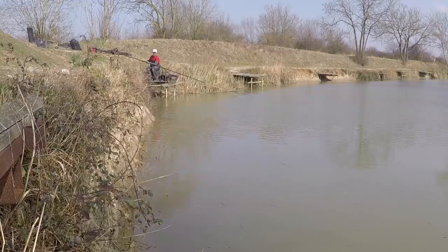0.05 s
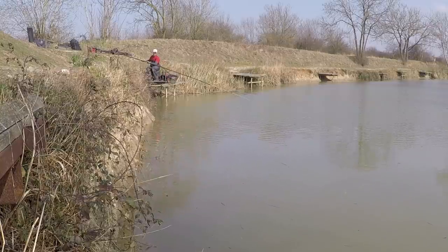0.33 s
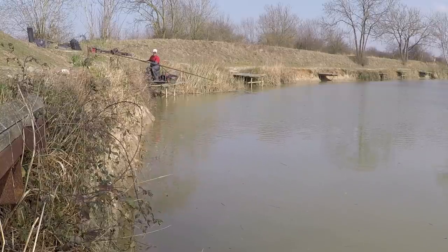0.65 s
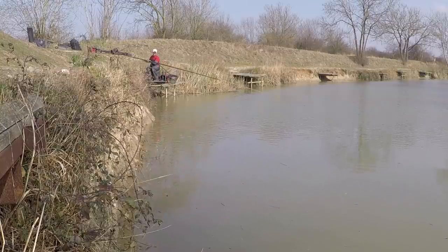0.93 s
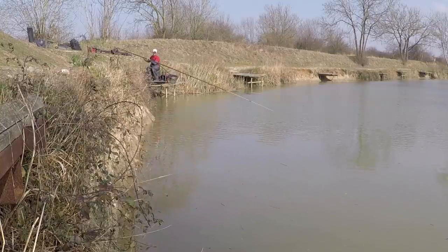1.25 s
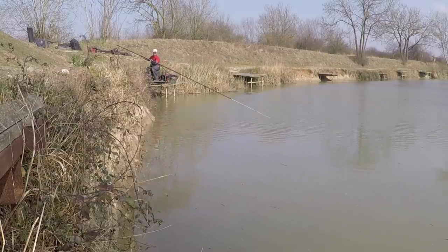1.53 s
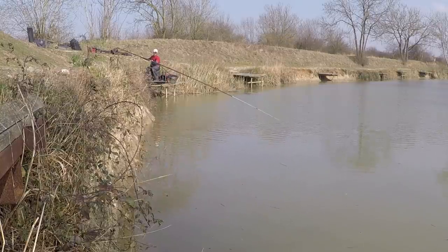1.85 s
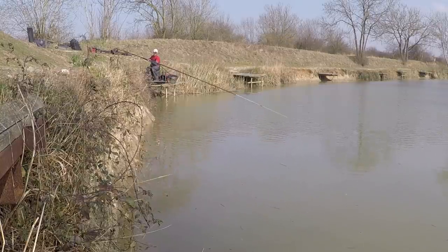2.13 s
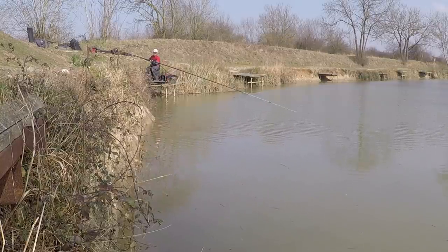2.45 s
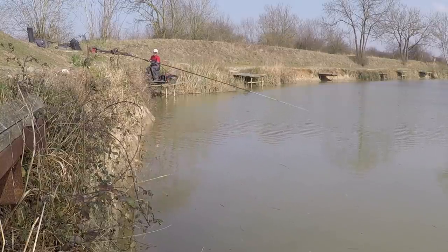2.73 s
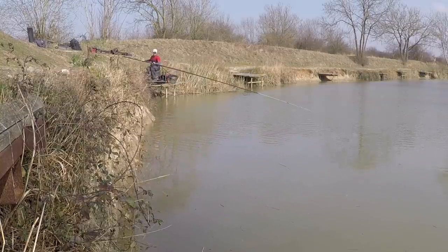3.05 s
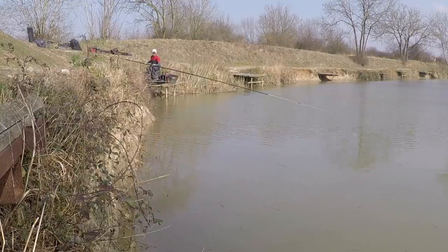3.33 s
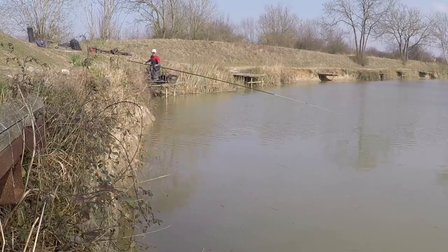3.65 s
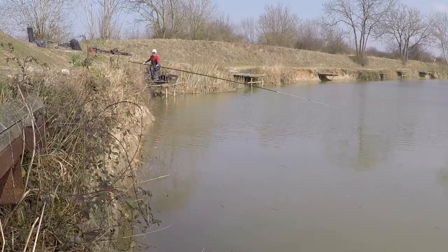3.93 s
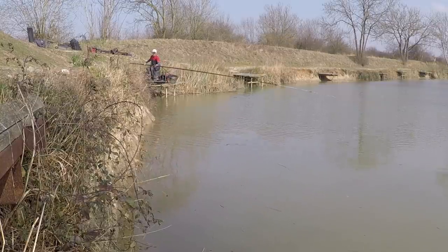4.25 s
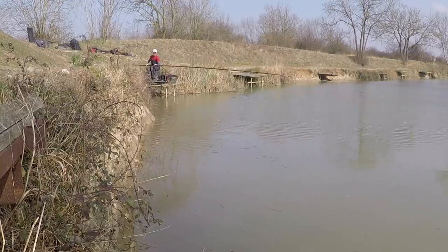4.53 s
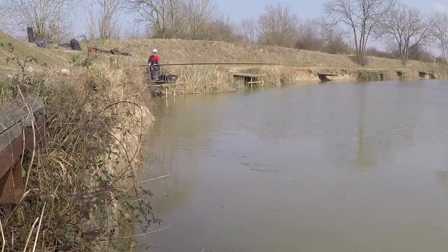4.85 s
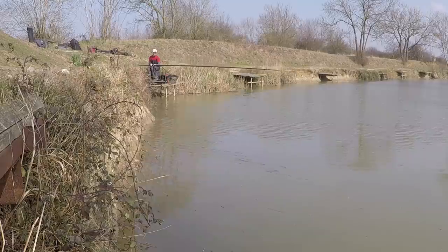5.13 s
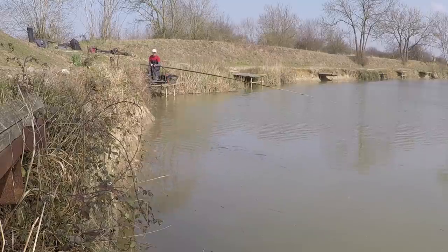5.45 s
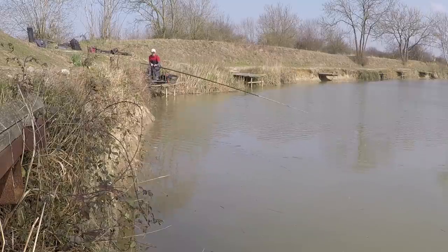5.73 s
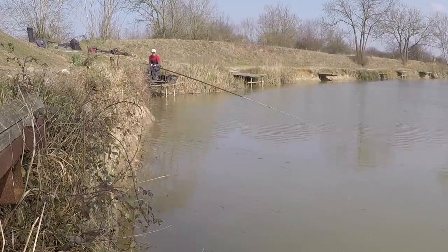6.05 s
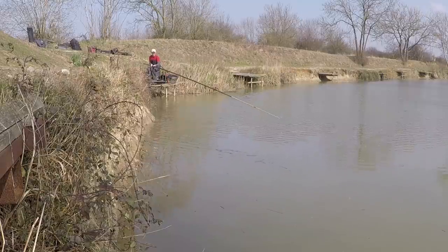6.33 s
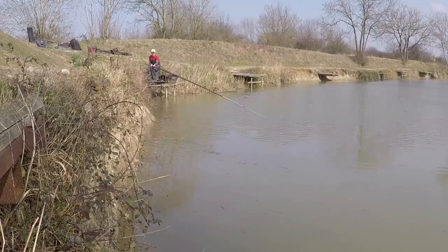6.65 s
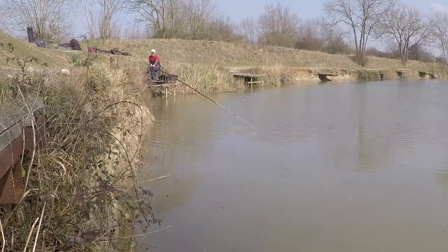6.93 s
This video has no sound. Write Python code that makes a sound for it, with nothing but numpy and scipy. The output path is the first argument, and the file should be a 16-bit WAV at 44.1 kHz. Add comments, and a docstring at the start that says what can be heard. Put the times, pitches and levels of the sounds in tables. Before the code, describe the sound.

A long hollow fishing pole slides through an angler's hands from the start, making dry, hissing strokes, about two or three a second, with small scuffs and faint sleeve rustle. The tube gives one light, hollow knock at about 1.4 seconds, and soft ticks come near 1 and 2 seconds. The strokes are strongest around 4 seconds. From about 4.8 to 5.6 seconds, during one longer slide, the rubbed tube sings a thin two-note whistle that swoops upward. From 5.5 seconds sleeves rustle and hands and tackle tick, with the sharpest clicks between 5.6 and 6 seconds, while the hiss fades toward the end at about 7 seconds. The handling sounds close and centred. Behind it, faint wind washes steadily over the open lake bank, and a far engine drones low, swelling slightly around 2 to 3 seconds.

```python
"""A long hollow fishing pole hisses in strokes, by sliding friction, as an angler draws it through his hands.
Struck once, the tube rings in its normal modes; as it is swung up, rubbing makes two resonances sing.
His sleeves rustle, and hands and tackle tick, most of all as he lowers the pole.
Behind him on the lake bank lie the broadband wash of wind over open ground and a far engine's drone."""
import sys
import numpy as np
from scipy import signal
from scipy.io import wavfile
from scipy.ndimage import uniform_filter1d

SR = 44100
rng = np.random.default_rng(int(sys.argv[2]) if len(sys.argv) > 2 else 0)


def generate_wav(signal):
    """Clip the signal to [-1, 1] and save it as 16-bit WAV at the path in sys.argv[1]."""
    frames = np.transpose(np.atleast_2d(signal))
    scaled = np.clip(frames, -1, 1) * 32767
    pcm = np.round(scaled).astype(np.int16)
    wavfile.write(sys.argv[1], SR, pcm)


N = 312669
TIME = np.arange(N) / SR

# Reach of the sharp part of the friction hiss: f/Hz, weight
SHARP_WEIGHT = [(4800, 0.2), (6200, 0.39), (7400, 1.17), (10000, 0.92)]


def pole_hiss(level_db=-0.5, rest_db=-70, patchy_db=1.5, flutter_db=0.6, grain_db=-0.1):
    """Sliding friction: the pulls add in power over a faint floor, and flutter as the skin catches."""
    # Pulls through the hand: t/s, duration/s, relative peak level/dB, fade/dB, hollow part/dB,
    # sharp part/dB, ridge f at mid-pull/Hz, ridge glide/Hz, ridge height/dB
    pulls = [(-0.105, 0.36, -40, 11, -10.5, -3.5, 5170, 0, 0.5),
             (0.181, 0.22, -44, 6.5, -7, -1.5, 5650, 600, 6),
             (0.372, 0.36, -41.3, 15, -8.5, -1.5, 4750, -700, 3.5),
             (0.652, 0.364, -43.5, 5, -5.5, -3, 5300, -2, 1.5),
             (0.989, 0.23, -39, 18.5, -8.5, 1, 4730, 0, 2), (1.163, 0.37, -39, 13.5, -7, -3, 5900, -2, 2),
             (1.52, 0.36, -37, 15, -10, 0, 4330, 0, 1.5), (1.832, 0.14, -42.5, 12, -5.5, -2, 4550, 0, 2),
             (1.932, 0.52, -40.5, 35.5, -5, -2.5, 4500, -2, 0),
             (2.56, 0.37, -39, 3.5, -5, -1, 4170, -2, 1.5), (2.842, 0.36, -41.5, 7.5, -5, -3.5, 5900, 0, 0),
             (3.152, 0.26, -38.5, 6, -8, -0.5, 4500, 600, 0.5),
             (3.379, 0.35, -37.5, 15, -6.5, -3.5, 4160, -1, 1.5),
             (3.72, 0.36, -34, 7, -10, -4, 4400, 1002, 1),
             (4.06, 0.46, -32, 14.5, -10, -2.5, 3780, 602, -1),
             (4.447, 0.17, -43.5, 18, -2.5, -2.5, 4200, 0, 0.5),
             (4.569, 0.14, -49.5, 17, 1.5, -1.5, 4200, 0, 3.5), (4.702, 0.22, -50, 2, 6, -4, 4200, -5, -2),
             (4.749, 0.97, -35.5, 8.5, -3.5, -3.5, 4400, -100, 2.5),
             (5.643, 0.26, -38.5, 21, -0.5, -3, 3930, 3, 4),
             (5.806, 0.31, -43, 15, -3.5, -6, 4240, -2, 0.5),
             (6.09, 0.27, -47.5, 27.5, 2.5, -7.5, 5900, 0, 0.5), (6.31, 0.23, -52.5, 32, 5, -7, 3600, 8, 3),
             (6.484, 0.38, -48, 20, 5, -5.5, 3300, -3, 1.5), (6.79, 0.47, -56, 0, 0, -3, 4050, 3, 6)]
    t, hz = grid(size=512)
    power = np.tile(gain_of(rest_db + grip_spectrum(hz, hollow_db=6, sharp_db=-2)) ** 2, (len(t), 1))
    for start, length, *manner in pulls:
        during = (t > start) & (t < start + length)
        power[during] += pull_power(t[during, None], hz, start, length, *manner)
    field_db = 10 * np.log10(power)
    field_db += patchy_db * patches(field_db.shape, frames=24, bins=7)
    field_db += flutter_db * patches((len(t), 1), frames=8, bins=1)
    grain = patches((N, 1), frames=24, bins=1)[:, 0]
    return shaped_noise(field_db + level_db) * gain_of(grain_db * grain)


def pull_power(t, hz, start, length, db, fade_db, hollow_db, sharp_db, ridge_hz, glide_hz, ridge_db):
    """Friction noise of one pull: brightest when loudest, with a ridge that glides as the hand travels."""
    ridge_width_hz, brightening = 660, 0.29
    level_db = 20 * np.log10(stroke(t, start, length, db, fade_db) + 1e-9)
    centre_hz = ridge_hz + glide_hz * ((t - start) / length - .5)
    ridge = ridge_db * np.exp(-((hz - centre_hz) / ridge_width_hz) ** 2)
    treble_db = brightening * (level_db - db) * read_spectrum(SHARP_WEIGHT, hz)
    return gain_of(level_db + grip_spectrum(hz, hollow_db, sharp_db) + ridge + treble_db) ** 2


def grip_spectrum(hz, hollow_db, sharp_db, notch_db=2.0, notch_hz=6200, notch_width_hz=600):
    """Spectral shaping, in dB: the grip weights the hollow and sharp bands against the core of the hiss."""
    # Friction spectrum: f/Hz, relative spectral level/dB
    friction = [(300, -20), (800, -21.5), (1300, -9), (2000, -4.5), (3100, -2), (4200, 0.5), (5000, 0),
                (6100, -2), (7500, -1), (9600, -3.5)]
    # Reach of the hollow part: f/Hz, weight
    hollow_weight = [(500, 0.54), (1500, 1), (2600, 0.67), (3800, 0.0097)]
    base_db = read_spectrum(friction, hz)
    bands_hz = [(3300, 6500), (1500, 3000), (7000, 9800)]  # core, hollow, sharp
    power = gain_of(base_db) ** 2
    core, low, high = (10 * np.log10(np.mean(power * (hz > a) * (hz < b))) for a, b in bands_hz)
    hollow_boost = hollow_db - (low - core)
    sharp_boost = sharp_db - (high - core)
    hollow = hollow_boost * read_spectrum(hollow_weight, hz)
    sharp = sharp_boost * read_spectrum(SHARP_WEIGHT, hz)
    # a tight grip splits the hiss into two humps
    notch = notch_db * np.clip(sharp_boost, 0, 2) * np.exp(-((hz - notch_hz) / notch_width_hz) ** 2)
    return base_db - core + hollow + sharp - notch


def stroke(t, start, length, db, fade_db, speed_up_s=0.28, stop_s=0.04):
    """Amplitude envelope of an arm movement: it gathers speed as the pressure eases, then stops quickly."""
    progress = np.clip((t - start) / length, 0, 1)
    speed = np.tanh(progress * length / speed_up_s) * np.tanh((1 - progress) * length / stop_s)
    shape = speed * gain_of(-fade_db * progress)
    return gain_of(db) * shape / (shape.max() + 1e-12)


def pole_knock(chatter_db=-12, chatter_hz=2300, chatter_width_hz=2200, rise_s=0.0038, decay_scale=0.91):
    """Impact excitation: pole sections clack and chatter briefly, then the tube's damped modes ring out."""
    # Modes of the tube: f/Hz, relative level/dB, unscaled 60 dB decay time/s
    modes = [(450, -12, 0.082), (760, -15.5, 0.21), (843, -13, 0.26), (874, -5.5, 0.18), (1190, -2, 0.14),
             (1248, 2, 0.092), (1364, 0, 0.075), (1710, -12, 0.06), (1787, -5, 0.13), (2044, -0.5, 0.089),
             (2160, -6, 0.12), (2280, 1.5, 0.061), (2680, -10, 0.1), (2830, -8, 0.09), (3540, -7, 0.086),
             (3850, -3, 0.081), (4000, -12, 0.054)]
    # Blows on the pole: t/s, relative level/dB, chatter duration/s
    blows = [(1.3908, -20, 0.031)]
    out, t = np.zeros(N), np.arange(SR // 4) / SR
    for start, db, length in blows:
        ring = np.zeros(len(t))
        for hz, mode_db, t60 in modes:
            decay = gain_of(mode_db - 60 * t / (t60 * decay_scale))
            ring += decay * np.sin(2 * np.pi * (hz * t + rng.random()))
        ring /= np.linalg.norm(gain_of(np.array(modes)[:, 1])) / 2
        ring *= 1 - np.exp(-t / rise_s)
        chatter = resonant_noise(chatter_hz, chatter_width_hz, len(t)) * np.exp(-(t / length) ** 2)
        add(out, start, gain_of(db) * (ring + gain_of(chatter_db) * chatter))
    return out


def pole_song(width_hz=150, fade_s=0.02, steady=0.55):
    """Resonance of the rubbed tube: an upper note swoops up and holds, a lower joins late and wanders."""
    # Two-note whistle: t/s, upper f/Hz, upper level/dB, lower f/Hz, lower level/dB
    whistle = [(4.825, 1330, -52, 900, -75), (4.865, 1770, -37.5, 1000, -67), (4.885, 1830, -38, 1040, -64),
               (4.905, 2070, -41.5, 1100, -60), (4.95, 2300, -40.5, 1190, -55),
               (4.99, 2400, -40, 1230, -45), (5.07, 2495, -42.5, 1310, -47), (5.12, 2540, -40, 1390, -43.5),
               (5.17, 2550, -40, 1390, -46), (5.22, 2580, -48.5, 1390, -40.5), (5.29, 2660, -48, 1350, -50),
               (5.38, 2800, -51, 1330, -49), (5.48, 2920, -47, 1490, -50), (5.56, 2900, -50, 1450, -46),
               (5.65, 2850, -58, 1430, -55)]
    upper_hz, upper_db, lower_hz, lower_db = follow(whistle, TIME)
    sounding = np.clip(np.minimum(TIME - whistle[0][0], whistle[-1][0] - TIME) / fade_s, 0, 1)
    upper = gain_of(upper_db) * resonant_noise(upper_hz, width_hz, N, steady)
    lower = gain_of(lower_db) * resonant_noise(lower_hz, width_hz, N, steady)
    return sounding * (upper + lower)


def sleeve_rustle(level_db=-2, crumple_db=2.5, patter_db=-8, folds_per_s=110, patter_hz=800):
    """Dull, uneven cloth noise, with shot noise from small folds snapping over at random."""
    # Cloth spectrum: f/Hz, relative spectral level/dB
    cloth = [(150, -17.5), (330, -6.5), (550, -8), (950, 2.5), (1500, -1), (2200, -5), (4000, -24.5)]
    # Sleeve movements: t/s, duration/s, relative peak level/dB, fade/dB
    moves = [(0.913, 2.82, -47.5, 5), (3.766, 0.17, -45.5, 0), (5.468, 0.51, -41.5, 6),
             (5.898, 0.44, -44.5, 10), (6.311, 0.13, -43, 4), (6.498, 0.45, -42, 26.5),
             (6.894, 0.31, -49.5, 11)]
    t, hz = grid(size=256)
    field_db = read_spectrum(cloth, hz) + crumple_db * patches((len(t), len(hz)), frames=4, bins=6)
    folds = (rng.random(N) < folds_per_s / SR) * rng.standard_normal(N)
    cycles = np.arange(-SR // 200, SR // 200) / SR * patter_hz
    snap = np.cos(2 * np.pi * cycles) * np.exp(-(2 * cycles) ** 2)
    patter = gain_of(patter_db) * unit_rms(signal.oaconvolve(folds, snap, "same"))
    motion = sum(stroke(TIME, *move) for move in moves)
    return (unit_rms(shaped_noise(field_db)) + patter) * gain_of(level_db) * motion


def tackle_ticks(rise_cycles=0.37, ring_db=-20, ring_cycles=3, low_cut_hz=200):
    """Heavily damped transients of hands and tackle: a few cycles each, a trace of ring and no bass."""
    # Ticks: t/s, relative level/dB, f/Hz, duration/cycles
    ticks = [(0.9452, -30.5, 1180, 7), (0.9462, -37, 810, 4), (0.9531, -31, 880, 2.7),
             (0.955, -36, 1150, 6), (2.111, -26, 1000, 1.6), (2.124, -27, 900, 1.6), (3.3102, -32, 550, 1),
             (3.8962, -31, 600, 1), (5.5075, -30.5, 640, 1.5), (5.625, -32, 550, 1.9),
             (5.6425, -35, 950, 2), (5.6486, -16, 760, 1.35), (5.9226, -18.4, 1100, 1),
             (5.9238, -31, 700, 1), (6.0108, -17, 1030, 1), (6.0122, -33, 700, 1.5), (5.656, -34, 450, 2),
             (5.663, -35, 520, 2), (5.676, -28, 1150, 2), (5.6845, -32, 550, 1.5), (5.7445, -26, 1360, 1.7),
             (5.7974, -27, 1500, 1), (5.825, -29, 950, 1), (5.872, -34, 1110, 1.5), (5.976, -31, 860, 1.5),
             (6.2026, -28, 956, 1.5), (6.2060, -27.5, 840, 1.4), (6.2513, -33, 750, 1.5),
             (6.32, -29, 1200, 1), (6.3595, -28, 900, 1), (6.4982, -30, 600, 1.7), (6.6645, -22, 1130, 1.2),
             (6.6675, -36, 640, 1.5)]
    out, t = np.zeros(N), np.arange(SR // 30) / SR
    for start, db, hz, length in ticks:
        cycles = t * hz
        body = np.sqrt(np.clip(1 - cycles / length, 0, 1))
        ring = gain_of(ring_db) * np.exp(-cycles / ring_cycles)
        envelope = np.tanh(cycles / rise_cycles) * (body + ring)
        add(out, start, gain_of(db) * envelope * np.sin(2 * np.pi * cycles))
    return signal.sosfilt(signal.butter(2, low_cut_hz, "highpass", fs=SR, output="sos"), out)


def grip_scuffs():
    """Band-limited friction noise: short scuffs and faint squeaks of the grip, some gliding in pitch."""
    # Scuffs: t/s, duration/s, level at the crest/dB, centre f/Hz, bandwidth/Hz, glide/Hz
    scuffs = [(0.125, 0.06, -42.5, 5000, 550, 0), (0.47, 0.075, -41.5, 5000, 500, -300),
              (0.861, 0.1, -45.5, 1238, 380, 0), (0.906, 0.038, -42, 2730, 1500, 0),
              (1.573, 0.023, -39, 1310, 1500, 0), (1.811, 0.024, -39, 1190, 700, 0),
              (2.096, 0.082, -41, 908, 700, 3), (2.189, 0.049, -46, 570, 300, 0),
              (2.809, 0.11, -44, 4300, 900, 0), (3.306, 0.08, -40.5, 4600, 800, 0),
              (3.336, 0.023, -45.5, 517, 500, 0), (3.971, 0.075, -35.5, 4790, 550, 1000),
              (4.076, 0.12, -36, 3620, 1700, -400), (4.15, 0.34, -46.5, 2470, 200, 0),
              (4.17, 0.36, -47, 1399, 600, -1.5), (4.191, 0.083, -35, 5030, 600, -400),
              (4.379, 0.096, -41, 4000, 500, -400), (4.15, 0.4, -45.5, 1780, 400, 0),
              (4.45, 0.24, -53.5, 1770, 240, 0), (4.76, 0.12, -50, 1790, 220, 0),
              (5.616, 0.072, -50, 564, 450, 0), (6.266, 0.064, -48.5, 519, 400, 2)]
    out = np.zeros(N)
    for start, length, db, hz, width_hz, glide_hz in scuffs:
        size = int(length * SR)
        rub = resonant_noise(hz + glide_hz * np.linspace(-.5, .5, size), width_hz, size)
        add(out, start, gain_of(db) * rub * np.sin(np.linspace(0, np.pi, size)))
    return out


def wind(level_db=-50.5, patchy_db=2.0, lull_s=4.71, lull_width_s=0.057, lull_db=-4.5):
    """Broadband flow noise of wind in distant trees and grass; the level dips briefly once."""
    # Wind spectrum: f/Hz, relative spectral level/dB
    wash = [(15, -28), (25, -26), (81, -5.5), (163, -5), (249, -3.5), (381, -7), (514, -6), (597, -6.5),
            (890, -3.5), (984, -1), (1200, -4.5), (1430, -6.5), (1540, -6), (1980, -17), (9800, -76)]
    t, hz = grid(size=2048)
    field_db = read_spectrum(wash, hz) + patchy_db * patches((len(t), len(hz)), frames=10, bins=8)
    dip_db = lull_db * np.exp(-((TIME - lull_s) / lull_width_s) ** 2)
    return gain_of(level_db + dip_db) * unit_rms(shaped_noise(field_db))


def diffuse_wind(level_db=-66):
    """Interaural decorrelation: the part of the wind noise that differs between the ears."""
    # Spectrum of that part: f/Hz, relative spectral level/dB
    diffuse = [(25, -5), (60, -1.5), (250, 0.5), (500, -2), (1000, 1), (2000, -9), (5000, -20), (9800, -24)]
    t, hz = grid(size=2048)
    field_db = np.tile(read_spectrum(diffuse, hz), (len(t), 1))
    return gain_of(level_db) * unit_rms(shaped_noise(field_db))


def far_engine(waver=0.28, waver_width_hz=7.1, roar_width_hz=120):
    """Tones plus narrow-band noise: two wavering notes sink slowly while a roar swells and passes."""
    # Notes: starting f/Hz, sag/(Hz/s), loudest t/s, level then/dB, fall to either side/(dB/s)
    notes = [(66, 0.275, 6.3, -62, 1), (139.7, 1.3, 2.2, -60.5, 4)]
    # Roar: t/s, centre f/Hz, level/dB
    roar = [(0, 290, -65), (1.3, 279.7, -55.5), (2.5, 255.5, -53.5), (3.4, 205.3, -54), (4.1, 234.2, -56.5),
            (4.7, 232.8, -61), (7.09, 230.6, -73)]
    out = np.zeros(N)
    for start_hz, sag, loudest_s, db, fall in notes:
        hz = start_hz - sag * TIME
        tone = np.sqrt(2) * np.sin(2 * np.pi * np.cumsum(hz) / SR)
        wavering = waver * resonant_noise(hz, waver_width_hz, N)
        out += gain_of(db - fall * abs(TIME - loudest_s)) * (tone + wavering)
    roar_hz, roar_db = follow(roar, TIME)
    return out + gain_of(roar_db) * resonant_noise(roar_hz, roar_width_hz, N)


def resonant_noise(hz, width_hz, size, steady=0):
    """Noise through a steep resonance that follows hz, rms 1; steady (0-1) evens out its envelope."""
    pole = np.exp(-np.pi * abs(width_hz) / SR)
    white = rng.standard_normal(size) + 1j * rng.standard_normal(size)
    baseband = signal.lfilter([1], [1, -2 * pole, pole * pole], white)
    carrier = np.exp(2j * np.pi * np.cumsum(hz * np.ones(size)) / SR)
    return unit_rms((baseband / abs(baseband) ** steady * carrier).real)


def shaped_noise(field_db):
    """Fourier synthesis of noise whose spectral level over (frames, bins) is field_db."""
    size = 2 * (field_db.shape[1] - 1)
    white = rng.standard_normal(field_db.shape) + 1j * rng.standard_normal(field_db.shape)
    _, sound = signal.istft((white * gain_of(field_db)).T, nperseg=size, noverlap=size - size // 4)
    return sound[:N] * np.sqrt(3 / size)


def patches(shape, frames, bins):
    """Random field smoothed by moving averages over time and frequency, rms 1."""
    smooth_in_time = uniform_filter1d(rng.standard_normal(shape), frames, axis=0)
    return unit_rms(uniform_filter1d(smooth_in_time, bins, axis=1))


def grid(size):
    """Frame times and bin frequencies of short-time spectra."""
    hop = size // 4
    return np.arange(N // hop + 5) * hop / SR, np.fft.rfftfreq(size, 1 / SR)


def read_spectrum(points, hz):
    """Interpolation on a logarithmic frequency axis."""
    f, value = np.transpose(points)
    return np.interp(np.log(hz + 1), np.log(f + 1), value)


def follow(rows, t):
    """Linear interpolation of each column of a curve at the times t."""
    times, *columns = np.transpose(rows)
    return [np.interp(t, times, column) for column in columns]


def add(mix, start, sound):
    """Superposes a sound on the mix at start seconds."""
    part = mix[round(start * SR):][:len(sound)]
    part += sound[:len(part)]


def gain_of(db):
    """Decibels to amplitude ratio."""
    return 10 ** (np.asarray(db) / 20)


def unit_rms(x):
    """Normalises to rms 1."""
    return x / np.sqrt(np.mean(x ** 2) + 1e-20)


def scene(scatter_db=-30):
    """Mid-side stereo: all sources sit in the centre; diffuse wind and scattered hiss add some width."""
    angler = pole_hiss() + pole_song() + sleeve_rustle() + pole_knock() + tackle_ticks() + grip_scuffs()
    centre = angler + wind() + far_engine()
    side = diffuse_wind() + gain_of(scatter_db) * pole_hiss()
    return np.array([centre + side, centre - side])


def record(dry, cutoff_hz=10000):
    """Band limiting by a steep linear-phase low-pass filter."""
    lowpass = signal.firwin(601, cutoff_hz, window=("kaiser", 8), fs=SR)
    return signal.oaconvolve(dry, lowpass[None], "same")


dry = scene()
out = record(dry)
generate_wav(out)
```